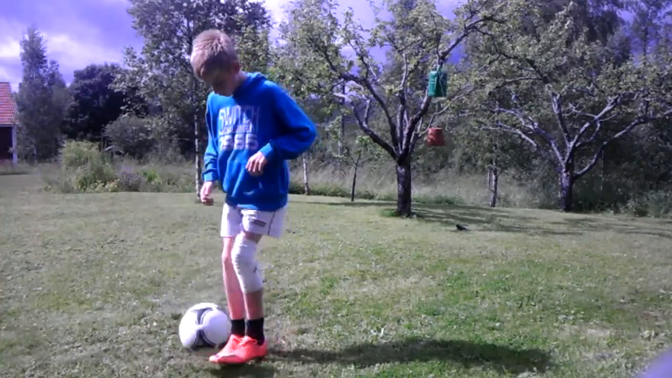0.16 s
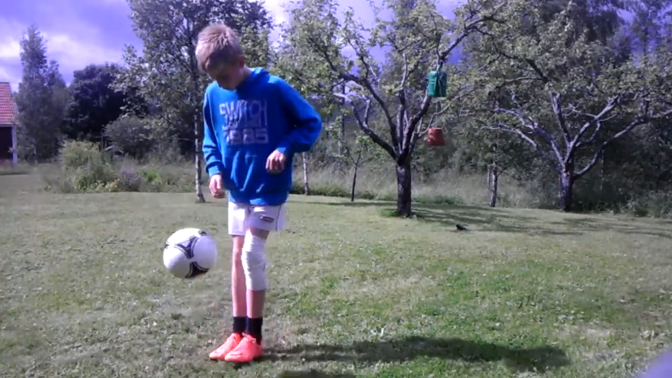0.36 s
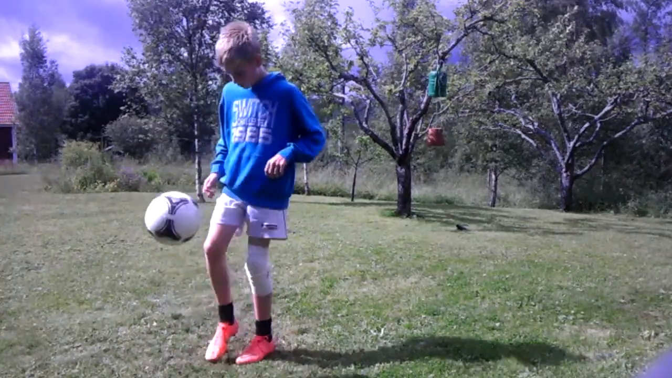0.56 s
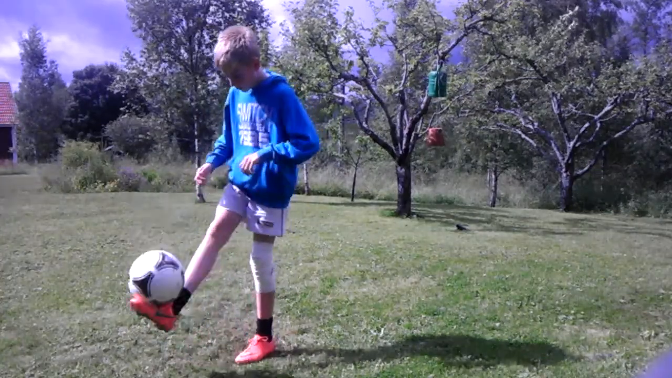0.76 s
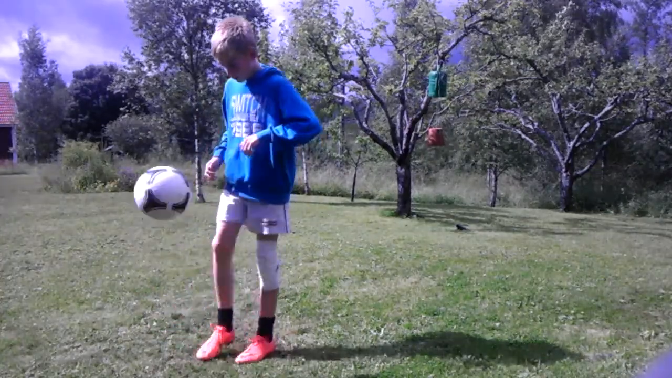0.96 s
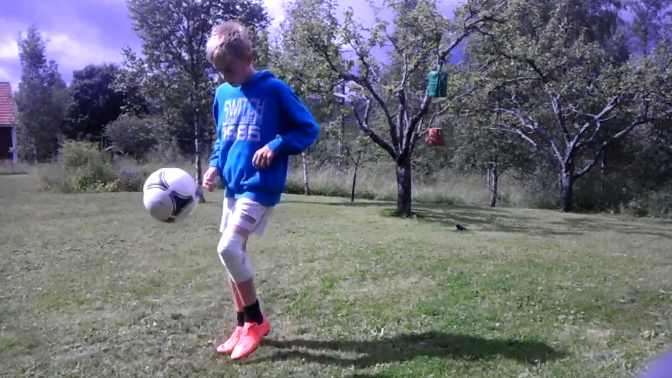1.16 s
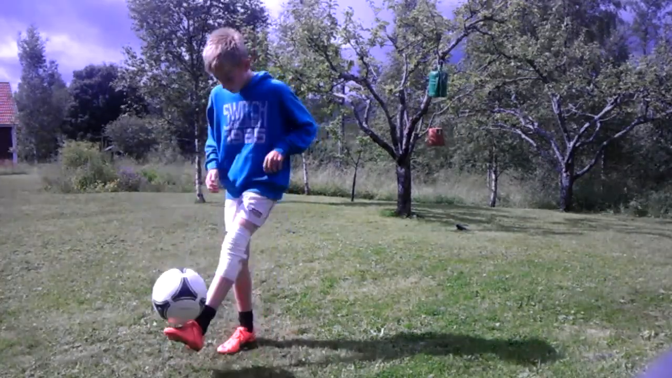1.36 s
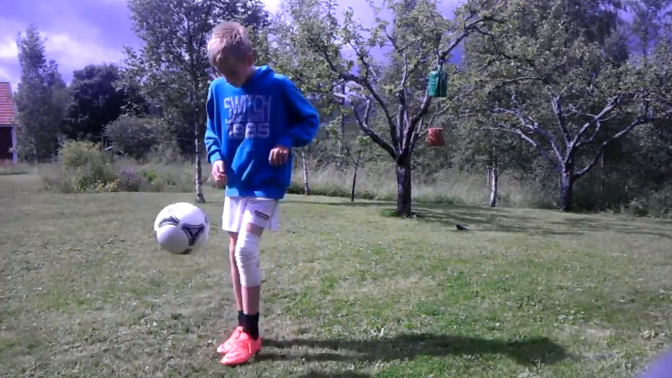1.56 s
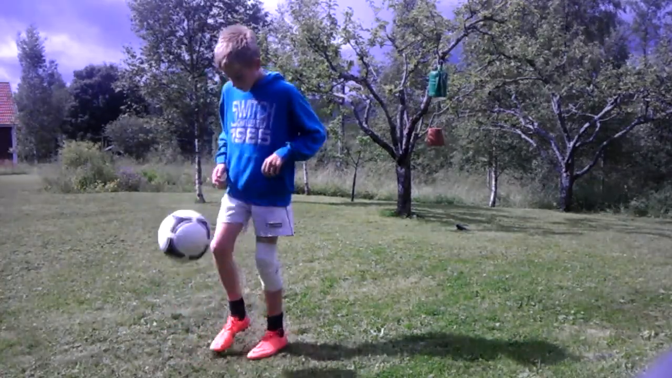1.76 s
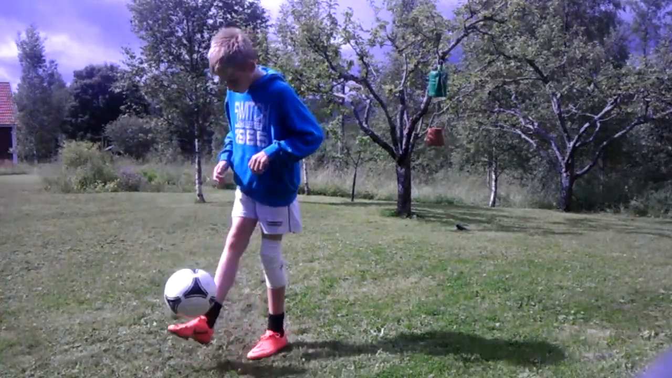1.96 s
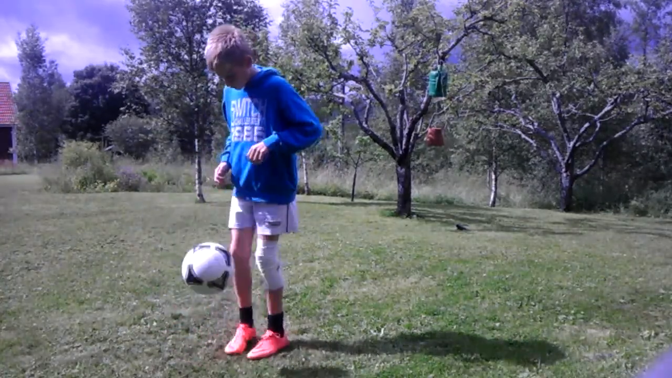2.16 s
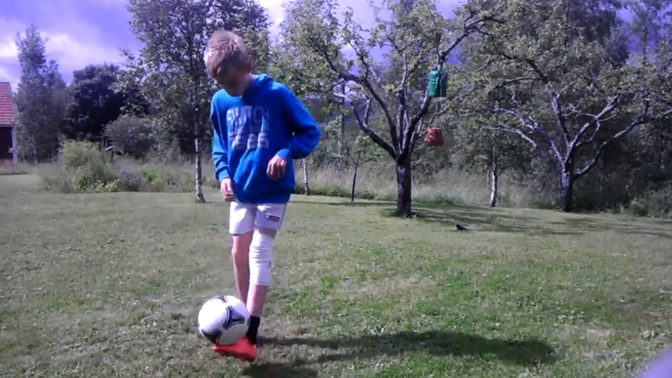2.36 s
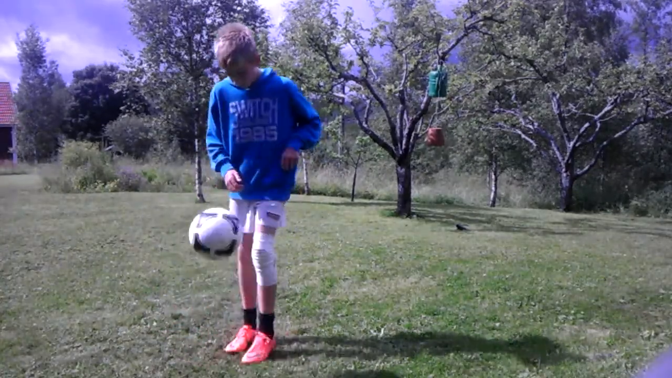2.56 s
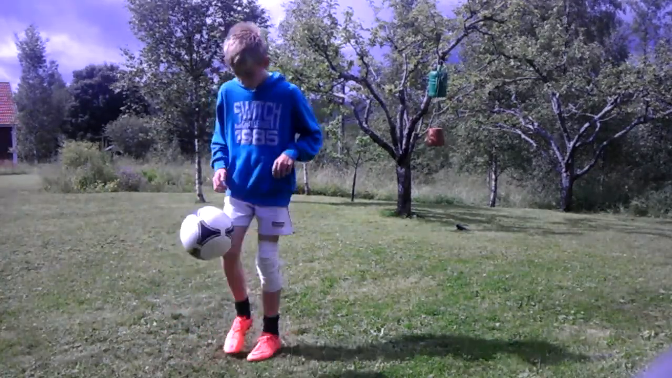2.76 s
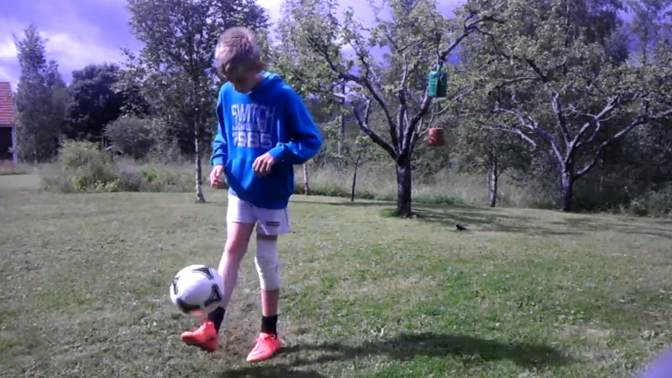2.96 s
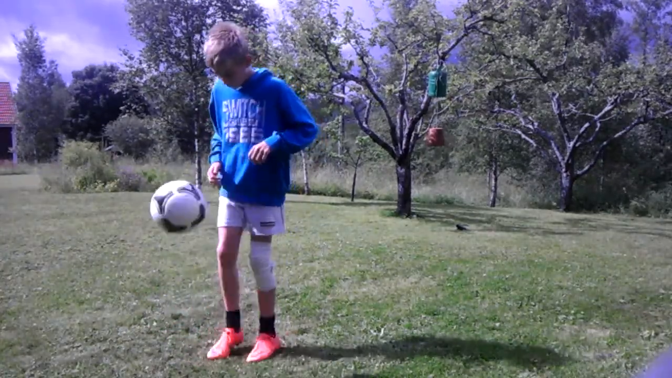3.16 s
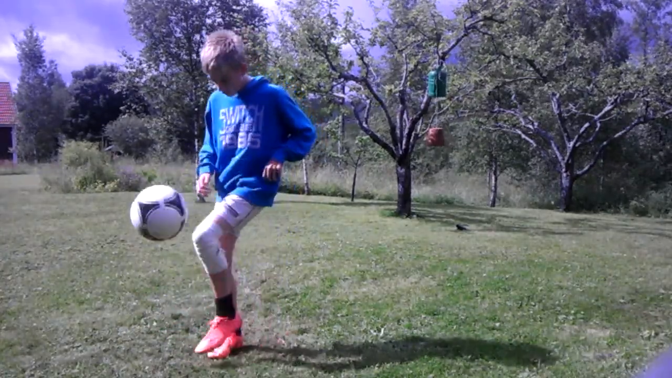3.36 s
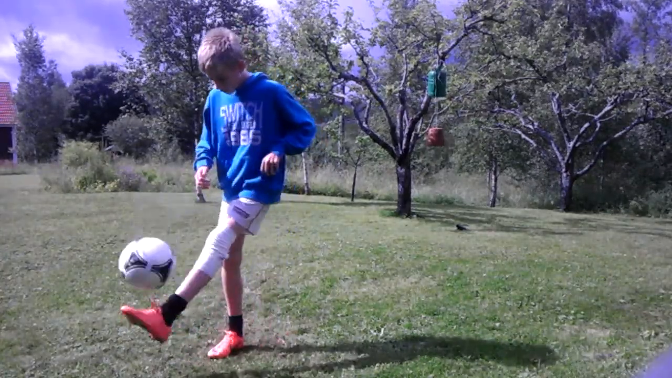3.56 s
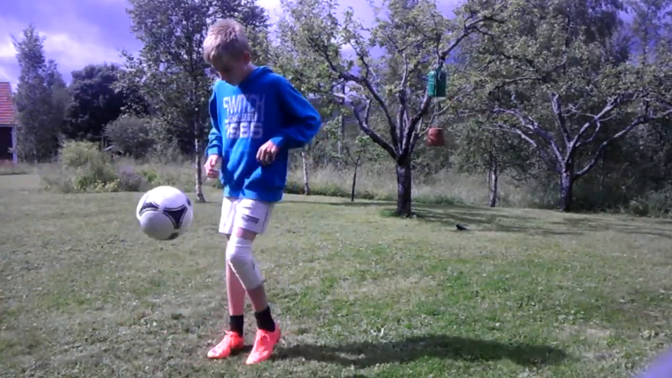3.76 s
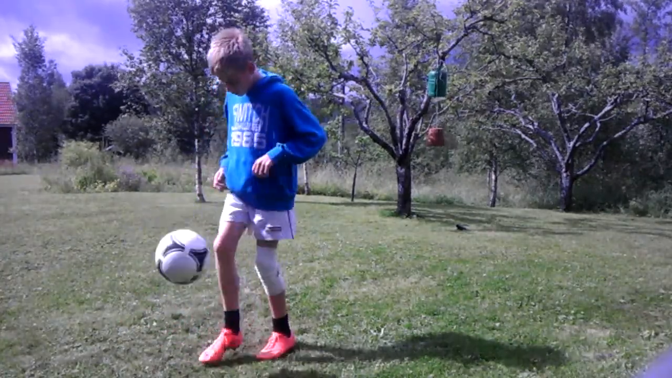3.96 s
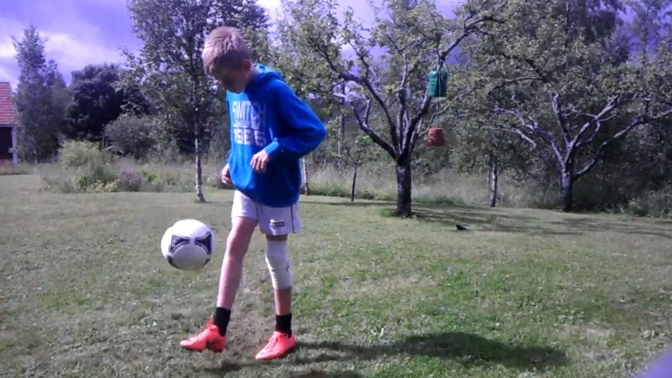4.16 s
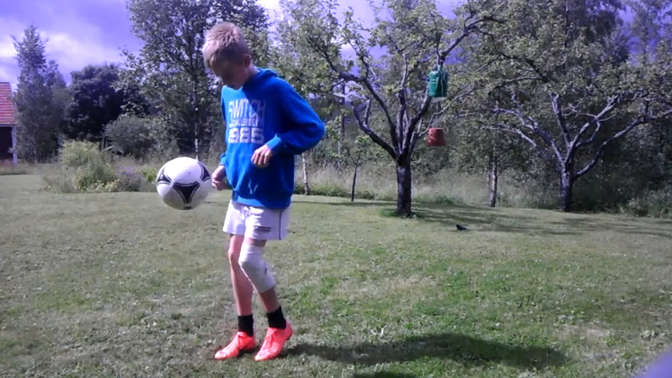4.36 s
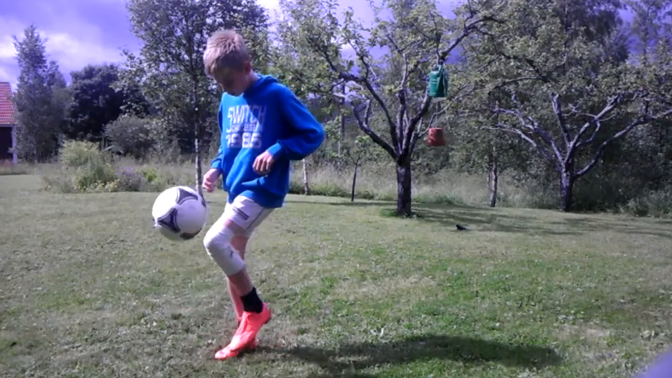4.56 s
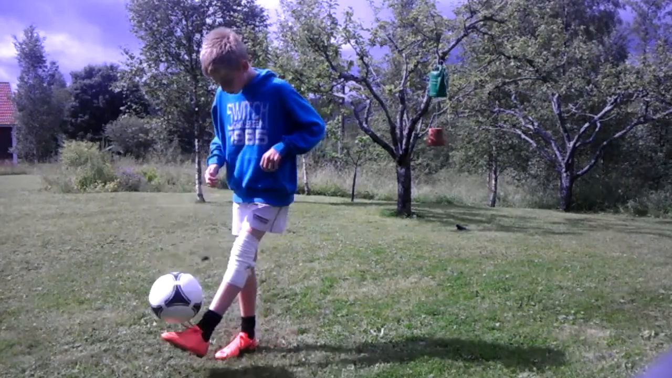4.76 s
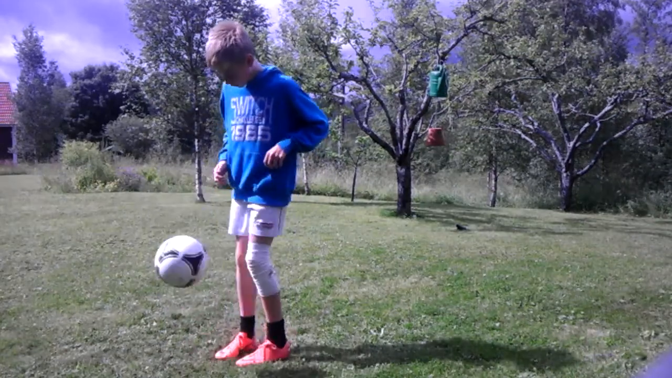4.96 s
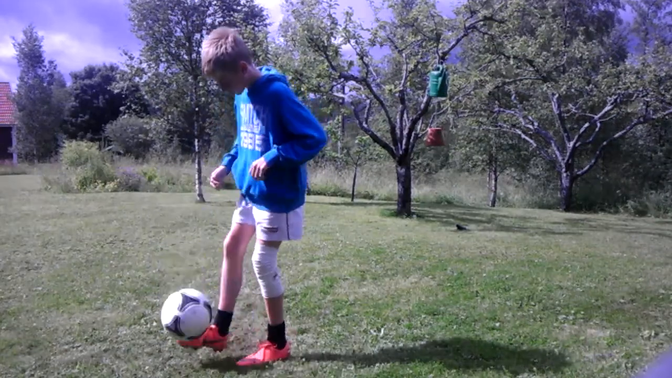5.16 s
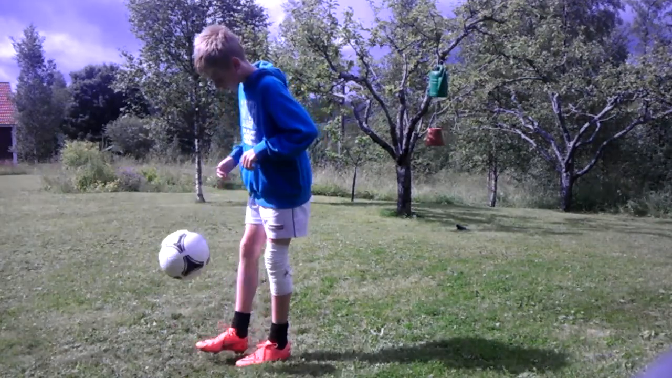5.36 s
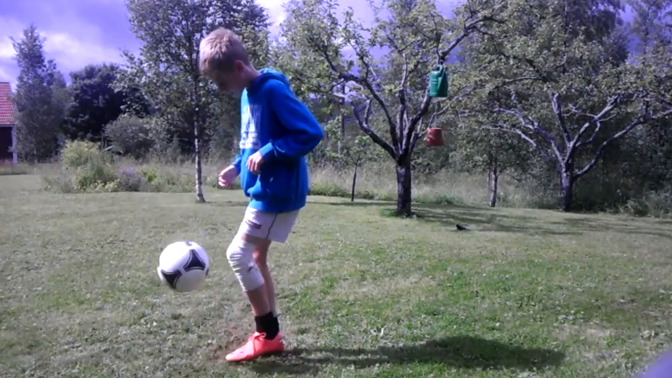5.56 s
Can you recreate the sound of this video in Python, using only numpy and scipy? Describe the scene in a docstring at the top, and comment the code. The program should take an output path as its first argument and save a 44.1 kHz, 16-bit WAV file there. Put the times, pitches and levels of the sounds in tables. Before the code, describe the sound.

A football is juggled on a lawn a few metres from the microphone. Each touch is a short slap with a dull thump and a brief hollow ring, followed by a slight outdoor echo. The first, at 0.4 seconds, is soft and half buried in wind. Others follow at about 0.9, 1.6, 2.1, 2.5, 3.1, 3.7, 4.2, 4.9 and 5.3 seconds, the sharpest at 1.6 and 2.5, mostly a little to the left. Low, lumpy wind buffets the microphone from both sides, strongest in the first half second and fading after one second. It returns on the left from 2.4 to 2.9, briefly near 3.5, then nearly dies away. A small bird chirps once, faintly, around 1.5 seconds. Light boot scuffs accompany the touches near 1.6, 2.1, 4.2 and 4.9. Distant leaves hiss softly throughout.

```python
"""Keepy-uppy in a breezy garden

A football is kept up off boots and thighs on a lawn, a few metres from a small stereo microphone. Each
touch is a slap, a thump as the ball dents and rebounds, and a ring of the air inside; a boot scuffs now
and then. Walls return two echoes and the trees a short tail. Wind buffets each microphone port on its
own, leaves hiss far off and a small bird chirps once."""
import sys
import numpy as np
from scipy import signal
from scipy.io import wavfile

SR = 44100
rng = np.random.default_rng(int(sys.argv[2]) if len(sys.argv) > 2 else 0)


def store_wav(level_fs):
    """Save 16-bit WAV to argv[1]."""
    pcm = np.round(np.clip(np.atleast_2d(level_fs), -1, 1) * 32767)
    wavfile.write(sys.argv[1], SR, pcm.T.astype(np.int16))


N = 247842

# Touches of the ball: (time [s], slap level [dB], slap pitch [Hz], slap left over right [dB], dent [dB],
# rebound [dB], contact [ms], shell ring [dB], air ring [dB], garden tail [dB])
TOUCHES = [(0.366, -36.5, 5900, 10, -30, -30, 7.7, -53, -44.5, -56),
           (0.9441, -20, 2960, 17, -25, -11, 7.15, -38, -33.5, -40.5),
           (1.5532, -9.5, 4380, 4.5, -16, -13, 7.6, -28.5, -33.5, -33),
           (2.0997, -19.5, 4630, 10, -28, -15, 6.95, -39, -65, -39),
           (2.5264, -16.5, 2670, 9.5, -16, -18, 7.34, -23.5, -36, -33.5),
           (3.1139, -33, 2000, 8, -25.5, -15, 7.8, -40.5, -48, -42),
           (3.6946, -19.5, 3500, 12, -21, -11.5, 8.5, -39.5, -36, -35.5),
           (4.2345, -19, 1800, 18.5, -29, -14, 7.3, -39.5, -54, -36.5),
           (4.9045, -22, 3060, 17, -20, -17.5, 8.6, -43, -34.5, -27.5),
           (5.3481, -27, 2210, 9, -28, -18.5, 7, -47, -47.5, -41.5)]


def ball():
    """The skin slaps, the ball dents and springs back; both jolts ring the shell and the air inside."""
    # Resonances of the ball: (pitch [Hz], gain [dB], time to fall 60 dB [s])
    modes = [(381, 5.5, 0.035), (896, 0.5, 0.056), (1034, 0.5, 0.086), (1173, -0.5, 0.058),
             (1384, 8.5, 0.025), (1635, -6, 0.048), (2000, -13, 0.029), (2170, -10, 0.02),
             (2720, -16, 0.014)]
    is_shell = np.array(modes)[:, :1, None] < 600    # modes above 600 Hz belong to the air inside
    dent, rebound, slap, ring = np.zeros(N), np.zeros(N), np.zeros((2, N)), np.zeros((2, N))
    jolts = np.zeros((len(modes), 2, N))
    t = np.arange(800) / SR
    snap = np.exp(-t / 0.00039) + 0.068 * np.exp(-t / 0.024)
    for s, slap_db, slap_hz, side_db, dent_db, rebound_db, contact_ms, shell_db, air_db, _ in TOUCHES:
        add(dent, s + 0.0023, from_db(dent_db) * bump(ms=2.07))
        add(rebound, s + contact_ms / 1000, from_db(rebound_db) * bump(ms=4.09))
        crack = butter(rng.standard_normal((2, len(t))) * snap, [0.5 * slap_hz, 1.58 * slap_hz], "band")
        add(slap, s, from_db(slap_db) * pan(side_db) * crack)
        ring_db = np.where(is_shell, shell_db, air_db)
        for after_s, jolt_db in (.002, -3), (contact_ms / 1000 + 0.00197, 0):
            strengths = from_db(ring_db + jolt_db + rng.normal(0, 1.1, (len(modes), 2, 1)))
            # each port hears different lobes of the air modes
            polarity = np.where(is_shell, 1, rng.choice([-1, 1], strengths.shape))
            add(jolts, s + after_s, strengths * polarity)
    for (hz, db, t60), clicks in zip(modes, jolts):
        r, w = from_db(-60 / (t60 * SR)), 2 * np.pi * hz / SR
        ring += from_db(db) * signal.lfilter([0, np.sin(w)], [1, -2 * r * np.cos(w), r * r], clicks + 1e-18)
    thump = dent + butter(rebound, [95, 260], "band", order=1)    # one swing as the ball regains its shape
    return thump + slap + ring * pan(-1.9)


def garden(direct, noise_bands):
    """Two dull echoes off walls, then scatter from the trees that dies band by band."""
    # Wall reflections: (delay [s], gain [dB], left over right [dB])
    echoes = [(.033, -21.5, -3), (.064, -21.5, -1)]
    # Colour of the tail: (frequency [Hz], spectral density [dB])
    tail_colour = [(100, 8), (200, -1), (400, 12), (800, -0.5), (1800, 1.5), (3000, -5), (5500, -6),
                   (10000, -15.5), (16000, -25)]
    # Decay of the tail: (frequency [Hz], time to fall 60 dB [s])
    tail_decay = [(200, 0.2), (1500, 0.24), (5000, 0.23), (14000, 0.3)]
    reflections = np.zeros((2, N))
    for delay_s, db, side_db in echoes:
        add(reflections, delay_s, from_db(db) * pan(side_db) * butter(direct, 2700, "low", order=1))
    s, *_, tail_db = np.transpose(TOUCHES)
    grain = from_db(2.6 * drift(hz=140))    # trunks and branches return the sound in lumps
    rise = np.exp(-1 / (0.00076 * SR))    # scatter builds up over a few ms
    scatter = np.zeros((2, N))
    for hz, noise in noise_bands:
        hits = np.full(N, 1e-18)
        hits[(s * SR).astype(int)] = from_db(tail_db + at_hz(tail_colour, hz))
        fall = from_db(-60 / (at_hz(tail_decay, hz) * SR))
        scatter += noise * signal.lfilter([1 - rise], np.convolve([1, -rise], [1, -fall]), hits)
    return reflections + grain * scatter


def scuffs():
    """A boot brushes grass or ball in short, grainy strokes."""
    # Boot strokes: (time [s], length [s], low edge [Hz], high edge [Hz], level [dB])
    strokes = [(4.17, 0.11, 5700, 12300, -55), (4.91, 0.058, 2130, 3400, -36),
               (2.11, 0.056, 2800, 8800, -47), (1.57, 0.036, 3100, 7600, -43.5)]
    out = np.zeros((2, N))
    for s, length_s, low_hz, high_hz, db in strokes:
        swell = bump(ms=1000 * length_s)
        grains = rng.standard_normal((2, len(swell))) * from_db(5.1 * rng.standard_normal(len(swell)))
        add(out, s, from_db(db) * swell * rms_one(butter(grains, [low_hz, high_hz], "band")))
    return out


def wind():
    """Each port gets its own lumpy rumble with single eddies on top; a stronger gust is brighter."""
    # Wind on the ports: (time [s], strength [dB], left over right [dB])
    gusts = [(0.0, -38, 6), (0.1, -32.5, -11), (0.22, -29, 4), (0.45, -36.5, -1.5), (0.62, -50.5, 3.5),
             (0.78, -45.5, -0.5), (0.9, -49.5, -3), (1.0, -41, -6), (1.1, -52, -1), (1.26, -59.5, 2),
             (1.36, -48, -3), (1.5, -58, -1), (1.8, -64.5, -2), (1.9, -59, -5), (2.0, -84, -6),
             (2.25, -55, 5.5), (2.55, -53, 15), (2.8, -45.5, 12.5), (2.97, -54.5, 14.5), (3.08, -66.5, 11),
             (3.33, -67.5, 9), (3.44, -44.5, 5.5), (3.6, -71.5, 7), (3.8, -59.5, 8), (4.02, -57.5, 7),
             (4.15, -72, 8), (4.5, -70.5, 5), (5.25, -84, 1), (5.5, -75, 3), (5.62, -48.5, 8)]
    # The strongest eddies: (time [s], port struck [left, right or both], level [dB], pitch [Hz])
    strong_eddies = [(0.061, "right", -16, 195), (0.104, "right", -19, 330), (0.115, "right", -12, 258),
                     (0.128, "right", -16.5, 350), (0.147, "right", -21.5, 257),
                     (0.164, "left", -17.5, 206), (0.183, "left", -13, 217), (0.203, "left", -12, 268),
                     (0.214, "both", -22, 332), (0.221, "both", -16, 188), (0.245, "left", -15.5, 217),
                     (0.263, "left", -21.5, 230), (0.298, "left", -19.5, 139), (0.385, "left", -15, 148),
                     (0.395, "right", -17, 195), (0.421, "right", -16.5, 161), (0.476, "both", -27.5, 245),
                     (0.503, "left", -24, 180), (0.746, "right", -22, 180), (0.762, "right", -25, 164),
                     (0.994, "right", -19, 200), (1.168, "right", -31.5, 192), (1.385, "right", -33, 157),
                     (1.54, "right", -28.5, 220), (2.31, "left", -38, 153), (2.42, "left", -35, 124),
                     (2.469, "left", -25.5, 232), (2.563, "left", -26, 190), (2.65, "left", -26.5, 182),
                     (2.703, "left", -23.5, 180), (2.72, "left", -20.5, 231), (2.777, "left", -18, 303),
                     (2.789, "left", -12.5, 174), (2.816, "left", -23.5, 170), (2.836, "left", -23.5, 234),
                     (2.899, "left", -33, 140), (3.225, "left", -35.5, 226), (3.411, "left", -34.5, 153),
                     (3.453, "left", -29, 143.6), (3.542, "left", -36, 149), (4.461, "both", -46.5, 174),
                     (5.584, "left", -41, 145)]
    lee_db = -17.5    # an eddy at the port it does not strike
    strength_db, side_db = in_time(gusts)
    gust_db = strength_db + side_db / 2 * np.array([[1], [-1]])
    lumps = from_db(gust_db + 2.6 * drift(hz=18))
    deep, low, high = rng.standard_normal((3, 2, N))
    deep = rms_one(butter(deep, [35, 100], "band"))
    low = rms_one(butter(low, [110, 230], "band"))
    high = rms_one(butter(butter(high, [230, 420], "band"), 690, "low"))
    brightness = from_db(-5 + 0.32 * (gust_db + 18.5) + 7.0 * drift(hz=31.4))
    ports = lumps * (deep + low + brightness * high)
    eddies = list(strong_eddies)
    for when, side, size, pitch in rng.random((60, 4)):    # weaker eddies ride on the gust
        port = int(side * 2)
        db = gust_db[port, int(when * N)] + 7.5 + 5.5 * (2 * size - 1)
        eddies.append((when * N / SR, ("left", "right")[port], db, 170 * 2 ** (pitch - .5)))
    for s, port, db, hz in eddies:
        shade_db = lee_db * np.array([[port == "right"], [port == "left"]])
        phases = rng.uniform(0, 2 * np.pi) + rng.normal(0, 0.37, (2, 1))
        add(ports, s - 1.304 / hz, from_db(db + shade_db) * eddy(hz, phases))
    return ports + 0.15 * ports[::-1]    # a little of each port leaks into the other


def eddy(hz, phases):
    """One swirl passing the ports: a few sagging cycles with a short pop as it arrives."""
    turns = np.linspace(-1.3, 2.1, round(3.4 * SR / hz))
    phase = 2 * np.pi * (turns - 0.096 * turns ** 2) + phases
    pop = np.exp(-((turns + 0.58) / 0.41) ** 2) * np.sin(phase * 540 / hz)
    pop_db = -21 + 18.5 * np.log2(hz / 200)    # small, quick eddies pop harder
    along = np.linspace(0, 1, len(turns))
    swell = np.sin(np.interp(along, [0, 0.3, 1], [0, np.pi / 2, np.pi])) ** 2    # fast in, slower out
    return np.sin(phase) * swell + from_db(pop_db) * pop


def leaves(noise_bands):
    """Far hiss of leaves, each band wavering a little, with a hollow tone in it."""
    # Colour of the hiss: (frequency [Hz], spectral density [dB])
    colour = [(60, -6), (150, -11.5), (300, -4.5), (600, -2.5), (900, -4.5), (1500, -9), (3000, -14.5),
              (5000, -19), (7000, -22.5), (9000, -20), (12000, -23), (16000, -32.5)]
    # Rise and fall of the hiss: (time [s], level [dB])
    levels = [(0.55, -52.5), (0.94, -52), (2.14, -57), (2.78, -53), (3.13, -56.5), (4.87, -60.5),
              (5.1, -58), (5.62, -60.5)]
    wavering = sum(noise * from_db(at_hz(colour, hz) + 2.17 * drift(hz=14.6)) for hz, noise in noise_bands)
    hiss = rms_one(wavering)
    hollow = rms_one(butter(hiss, [561, 609], "band", order=1))
    return from_db(in_time(levels)) * (hiss + from_db(-14 + 5.0 * drift(hz=2.7)) * hollow)


def bird():
    """One chirp of short, mostly falling whistles, blurred by distance and foliage."""
    # Syllables: (time [s], length [s], first pitch [Hz], last pitch [Hz], level [dB])
    syllables = [(1.462, 0.025, 5300, 5450, -61), (1.49, 0.036, 5520, 4900, -56.5),
                 (1.525, 0.077, 5750, 5000, -51), (1.61, 0.059, 5360, 4160, -53),
                 (1.658, 0.048, 5550, 4640, -55.5)]
    fade_db = -5    # over each syllable
    chirp = np.zeros(N)
    for s, length_s, first_hz, last_hz, db in syllables:
        along = np.linspace(0, 1, round(length_s * SR))
        hz = first_hz + (last_hz - first_hz) * along ** 2.52    # the pitch holds, then slides
        envelope = from_db(db + fade_db * along) * np.hanning(len(along)) ** 0.36
        add(chirp, s, envelope * np.sin(2 * np.pi * np.cumsum(hz) / SR))
    for delay_s, db in (.007, -6.5), (.017, -7):    # scatter off branches
        add(chirp, delay_s, from_db(db) * chirp)
    return chirp * from_db(5 * drift(hz=110)) * pan(6)


def diffuse_bands():
    """Half-octave bands of stereo noise, wider in the treble: (centre [Hz], noise)."""
    # Likeness of the two channels: (frequency [Hz], correlation [0-1])
    likeness = [(60, 0.38), (240, 0.83), (950, 0.23), (3770, 0.12), (15000, 0.17)]
    edges = 45 * 2 ** np.arange(0, 8.6, .5)
    white, out = rng.standard_normal((2, 2, N)), []
    for k, (low, high) in enumerate(zip(edges, edges[1:])):
        mid, side = butter(white[k % 2], [low, high], "band")
        hz = np.sqrt(low * high)
        alike = np.clip(at_hz(likeness, hz), 0, 1)
        out.append((hz, np.sqrt(1 + alike) * mid + np.sqrt(1 - alike) * side * [[1], [-1]]))
    return out


def drift(hz):
    """Smooth random wander of spread 1, one track per channel."""
    hop = 40
    r = np.exp(-2 * np.pi * hz * hop / SR)
    white = rng.standard_normal((2, N // hop + 2002))
    slow = rms_one(signal.lfilter([1], [1, -2 * r, r * r], white)[:, 2000:])
    return np.array([np.interp(np.arange(N) / hop, np.arange(len(track)), track) for track in slow])


def from_db(db):
    return 10 ** (np.asarray(db) / 20)


def rms_one(x):
    return x / np.sqrt(np.mean(x ** 2, axis=-1, keepdims=True) + 1e-20)


def at_hz(points, hz):
    frequencies, values = np.transpose(points)
    return np.interp(np.log(hz), np.log(frequencies), values)


def in_time(rows):
    s, *columns = np.transpose(rows)
    return np.array([np.interp(np.arange(N) / SR, s, column) for column in columns])


def butter(x, hz, kind, order=2):
    return signal.sosfilt(signal.butter(order, hz, kind, fs=SR, output="sos"), x + 1e-18)


def pan(side_db):
    return from_db([[side_db / 2], [-side_db / 2]])


def bump(ms):
    return np.hanning(max(round(ms * SR / 1000), 3))


def add(out, s, piece):
    """Mixes a piece in at a time in seconds."""
    at = max(round(s * SR), 0)
    out[..., at:at + piece.shape[-1]] += piece[..., :N - at]


def scene():
    """The ball and the garden's answer, with wind, leaves, bird and boot scuffs around them."""
    direct, noise_bands = ball(), diffuse_bands()
    return direct + garden(direct, noise_bands) + wind() + leaves(noise_bands) + bird() + scuffs()


def record(dry):
    """The microphone hisses; a low cut against wind smears every thump; the top is cut."""
    hiss_db, low_cut_hz, top_hz = -70, 85.8, 16650
    hiss = from_db(hiss_db) * rms_one(butter(rng.standard_normal(dry.shape), 7200, "high"))
    thinned = butter(dry + hiss, low_cut_hz, "high", order=4)
    return signal.sosfilt(signal.cheby2(12, 60, top_hz, fs=SR, output="sos"), thinned)


dry = scene()
out = record(dry)
store_wav(out)
```